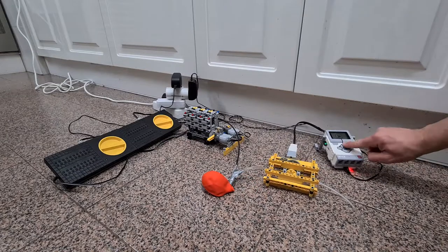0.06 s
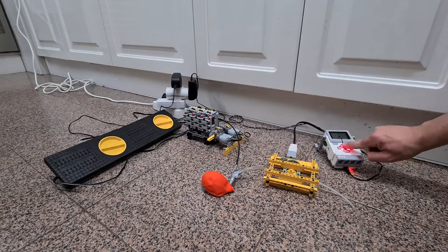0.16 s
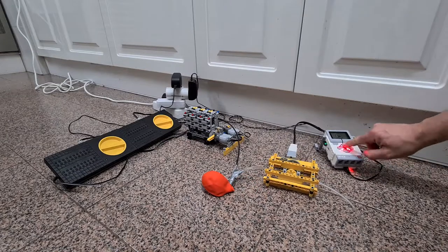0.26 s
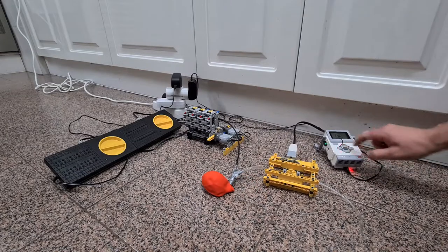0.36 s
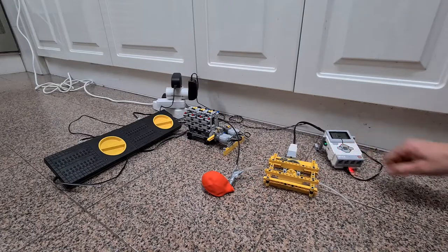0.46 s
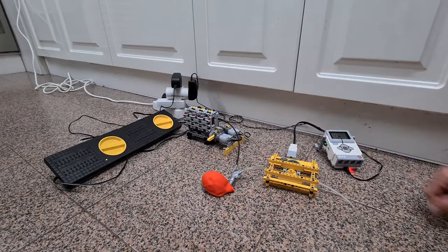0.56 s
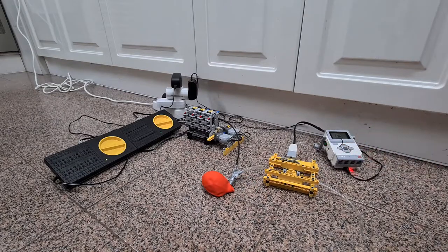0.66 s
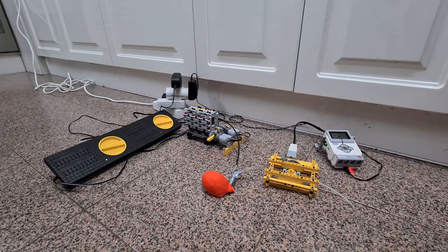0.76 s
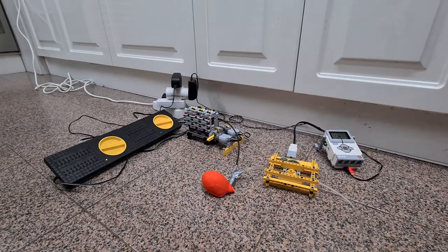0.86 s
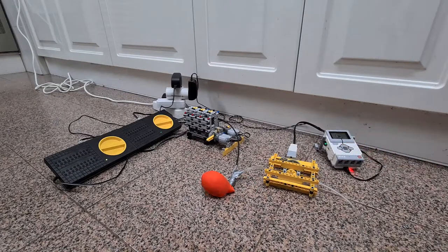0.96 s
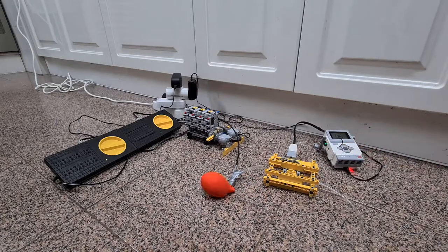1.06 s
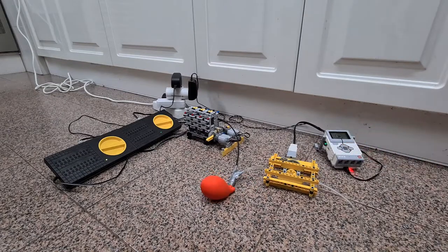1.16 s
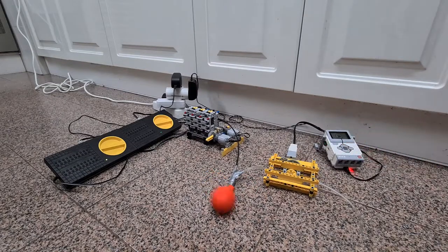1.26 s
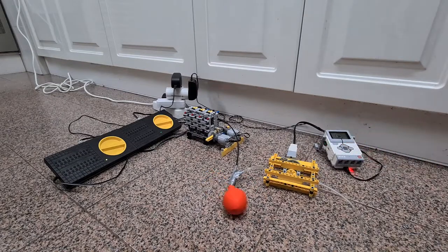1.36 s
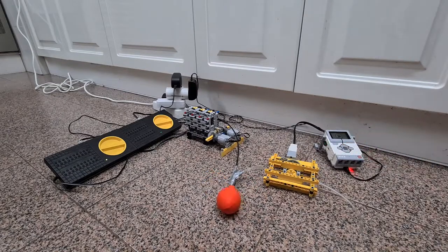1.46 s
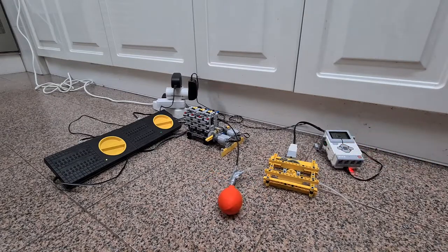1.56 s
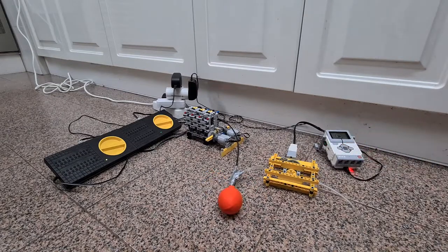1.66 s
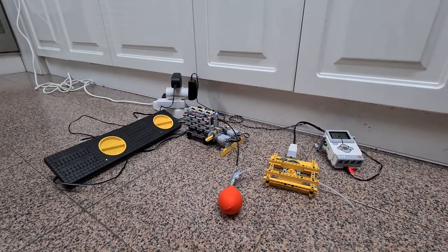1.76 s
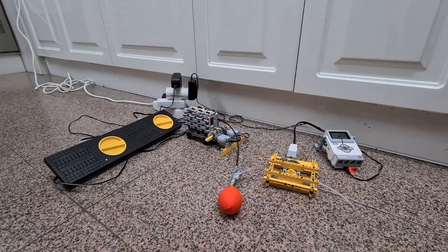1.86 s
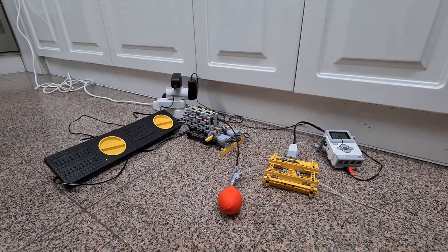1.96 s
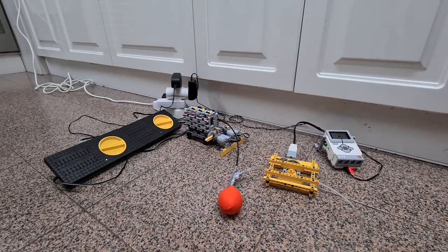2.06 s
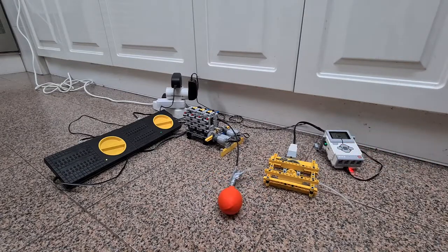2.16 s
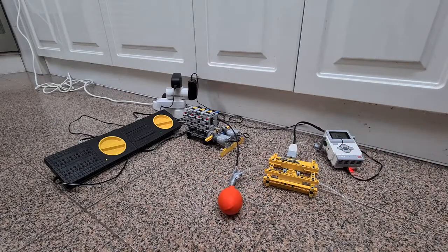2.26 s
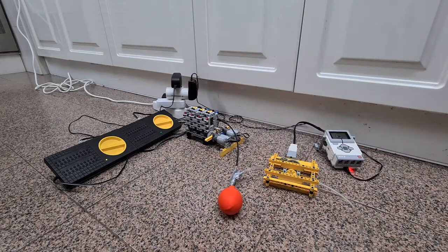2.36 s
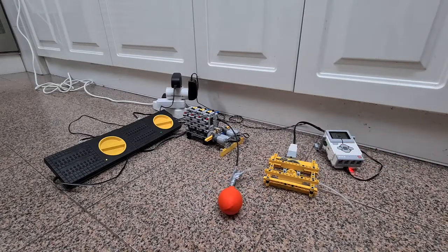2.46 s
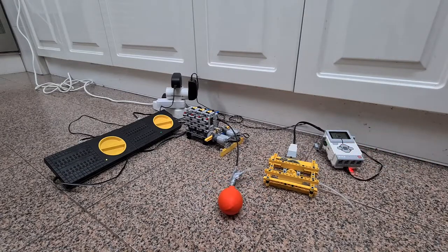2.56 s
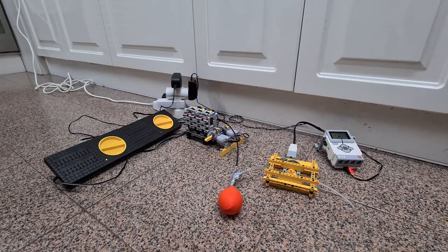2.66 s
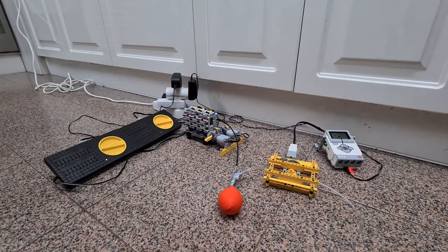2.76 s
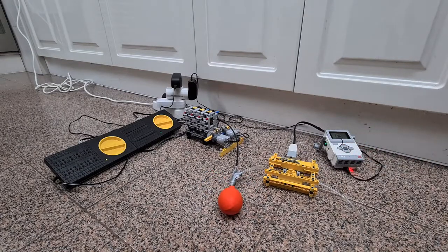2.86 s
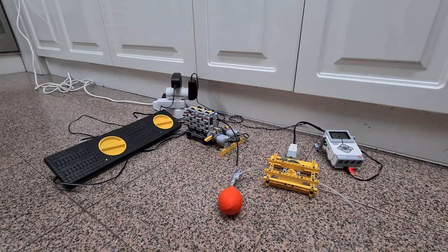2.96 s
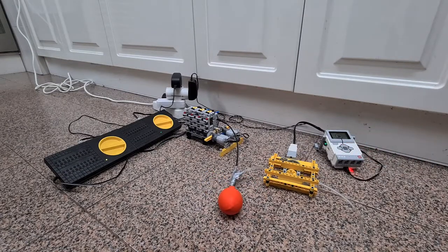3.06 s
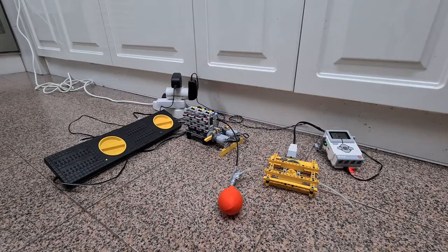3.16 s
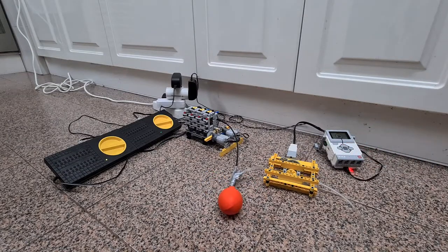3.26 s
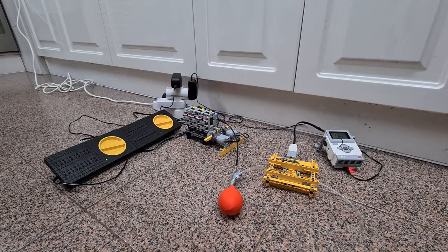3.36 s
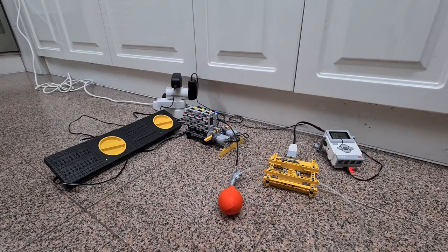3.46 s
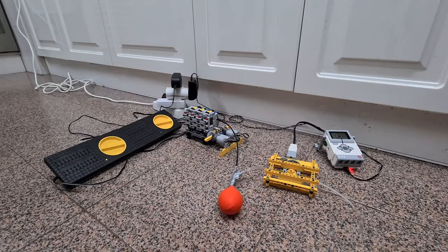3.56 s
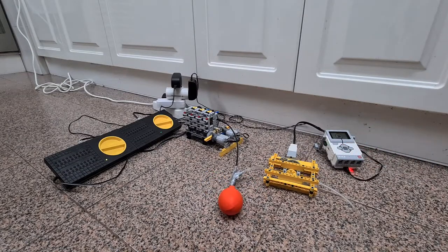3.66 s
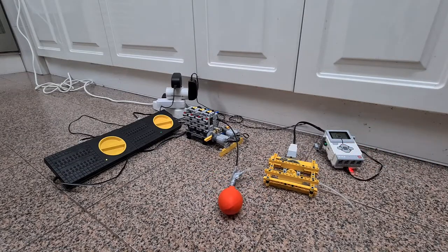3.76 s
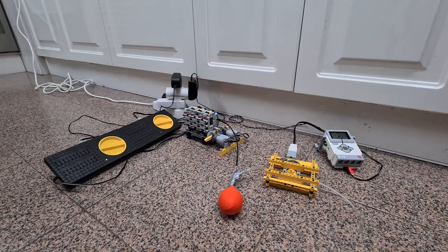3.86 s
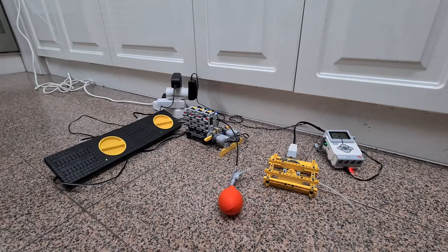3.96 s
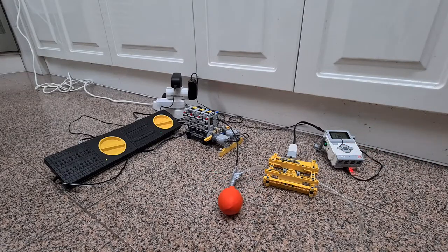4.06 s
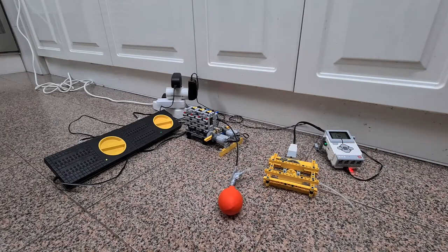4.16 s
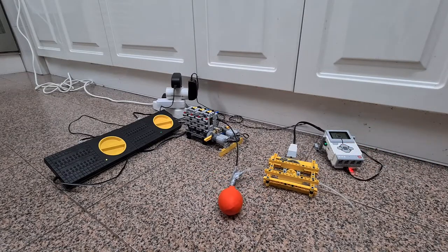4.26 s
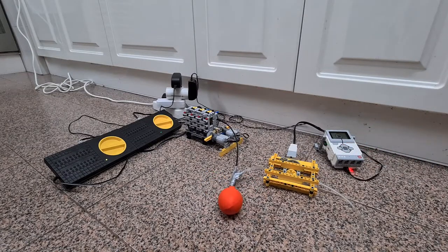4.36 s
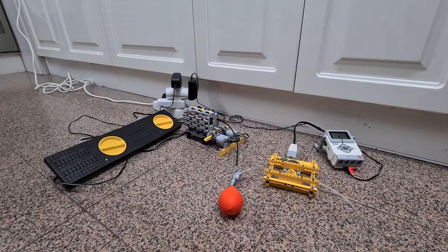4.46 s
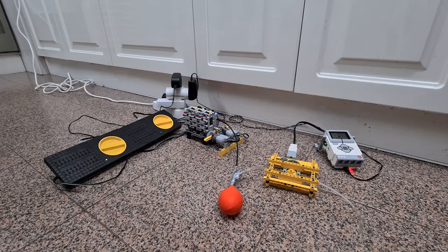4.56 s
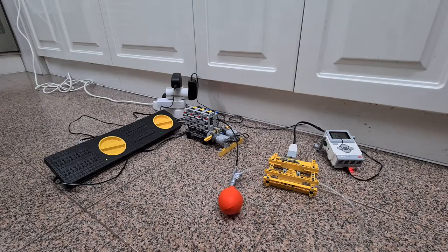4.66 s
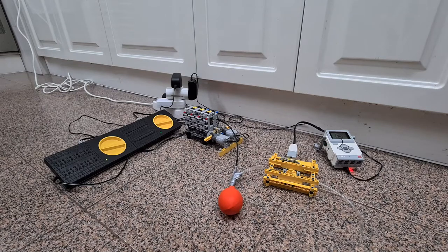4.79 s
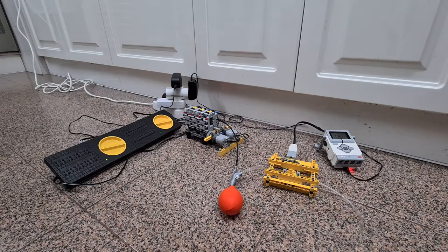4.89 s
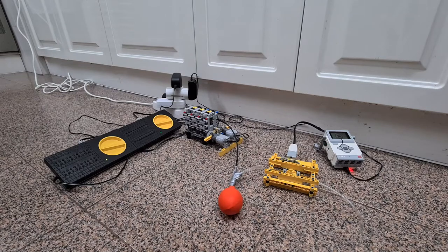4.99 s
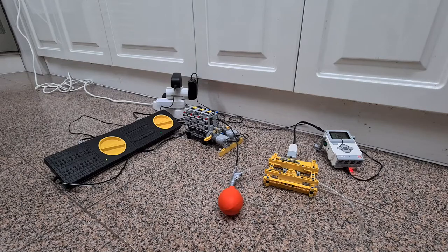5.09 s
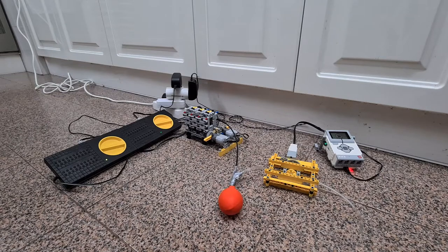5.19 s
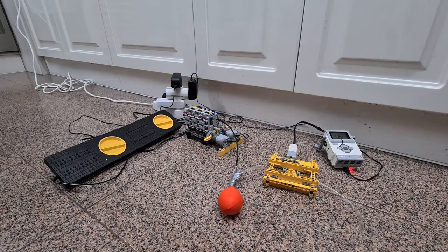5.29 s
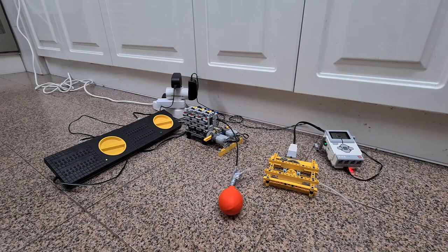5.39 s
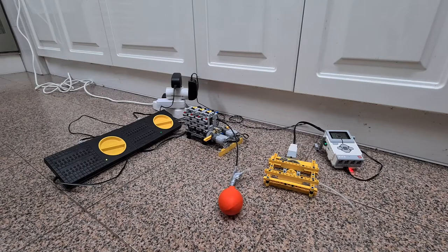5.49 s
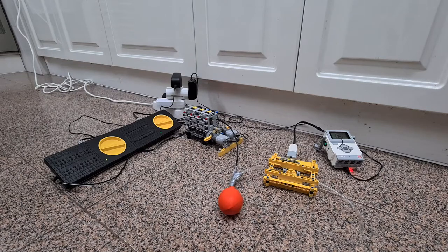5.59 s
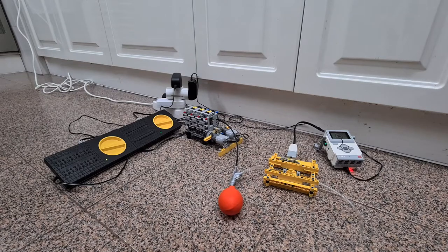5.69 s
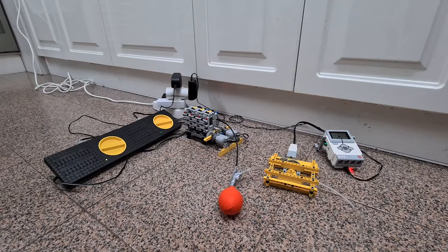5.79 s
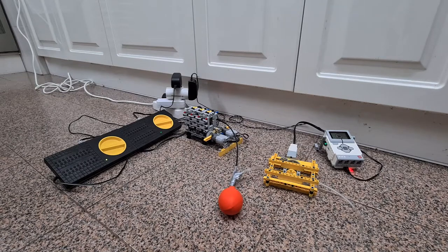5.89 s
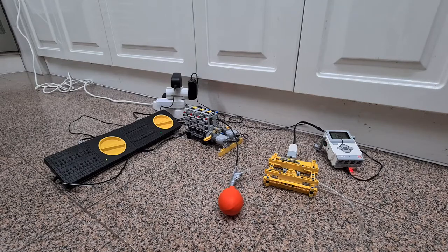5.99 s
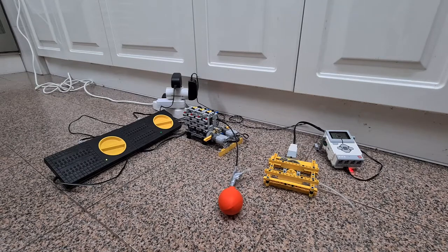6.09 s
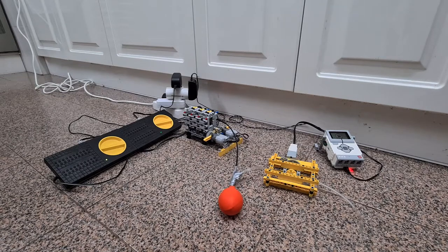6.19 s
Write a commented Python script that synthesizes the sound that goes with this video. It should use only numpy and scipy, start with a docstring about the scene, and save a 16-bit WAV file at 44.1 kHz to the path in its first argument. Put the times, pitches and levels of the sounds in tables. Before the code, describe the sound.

After a couple of clicks, a small motorized air pump whirs to life and keeps up a fast plastic clatter with airy hiss.

```python
"""A small electric air compressor with plastic gears stands on a stone floor and fills a balloon.
First a button clicks down and springs back. The motor starts with a tick and the gears creak.
Then the gears rattle and whine. On each turn of the crank six valves tick, the loose links knock
and the frame shudders; ticks and hiss grow as the air pressure builds. Early on the balloon tips
against the floor, later the frame bumps once, and the motor runs on to the end."""
import sys
import numpy as np
from scipy import signal
from scipy.fft import rfft, irfft, next_fast_len
from scipy.io import wavfile

SR = 44100
rng = np.random.default_rng(int(sys.argv[2]) if len(sys.argv) > 2 else 0)


def transcribe(u):
    """Save the signal u as a 16-bit wav file named by the first command-line argument.

    u: samples, shape (n,) or (channels, n), limited to [-1, 1]; the rate is SR.
    q: integer samples, one column per channel.
    """
    v = np.clip(np.atleast_2d(u).T, -1, 1)
    q = np.round(v * 32767).astype(np.int16)
    wavfile.write(sys.argv[1], SR, q)


N = 274743
TIME = np.arange(N) / SR
FFT_SIZE = 2 * next_fast_len(N // 2 + SR // 4)
FREQ_HZ = np.maximum(np.arange(FFT_SIZE // 2 + 1) * SR / FFT_SIZE, 1)
TURNS_PER_S, REST_TURNS = 6.3484, 0.3346   # the crank's set speed and its angle before the start
ROOM_DECAY_S = 0.18   # every decay here is the time to fade by 60 dB

# Overall tone of the gears: pitch_hz, level_db
GEAR_TONE = [(120, -42), (200, -18), (373, -16.5), (529, -9.5), (590, -12), (836, -13.5), (1120, -5),
             (1530, -10), (1940, -0.5), (2330, -3.5), (4350, -6), (4770, 3.5), (13300, -13), (16000, -16)]
# Peaks and dips that the plastic housing adds: pitch_hz, width_hz, gain_db
HOUSING_PEAKS = [(210, 30, -21.5), (369.4, 11, 8.5), (534, 69, -14), (596, 71, 10), (759, 37, 11.5),
                 (801, 150, -3.5), (922, 30, 8.5), (990, 42, 6.5), (1054, 24, 7), (1250, 270, 4.5),
                 (1533, 61, -2.5), (1930, 20, 2.5), (2320, 370, -3.5), (2923, 190, 6.5), (3550, 190, -3.5),
                 (3700, 140, 7.5), (4030, 57, 6), (4430, 330, -3), (5060, 440, -8.5), (6000, 900, -4),
                 (6950, 2500, 2), (8140, 330, 3.5)]
# Notes of the meshing gears at the set speed: pitch_hz, level_db
WHINE_NOTES = [(1940, -50), (2890, -55), (4700, -52), (4860, -54), (5650, -54)]
# The pistons hold the gears back and let them go: place_turns, extra_speed_share, whine_db
PISTON_LOAD = [(0.02, -0.01, 1.5), (0.15, 0.011, -4), (0.3, 0.0047, -1.5), (0.5, 0.012, -4),
               (0.59, -0.013, -1), (0.76, 0.016, -1.5), (0.92, -0.002, -5)]
# Valve ticks in each turn: place_turns, level_db
VALVE_TICKS = [(0.995, -28), (0.15, -37.5), (0.322, -28.5), (0.488, -30.5), (0.648, -39), (0.824, -26)]
# Tone of a valve tick: pitch_hz, level_db
VALVE_TONE = [(300, -14), (700, -15), (1200, 1), (2000, -9.5), (3200, 7), (4500, -2), (7000, 5.5),
              (10000, 2), (13000, 2.5), (16000, -1)]
# A valve snaps shut harder: start_s, level_db
VALVE_SNAPS = [(1.709, -36), (2.025, -37), (3.788, -39), (4.074, -40), (5.176, -39), (5.648, -36)]
# Tone of a snap: pitch_hz, level_db
SNAP_TONE = [(1000, -19), (5000, -3), (8500, 6), (10500, 9), (12500, -9), (16000, -30)]
# Knocks of the loose links in each turn: place_turns, level_db
LINK_KNOCKS = [(0.165, -46), (0.33, -50.5), (0.48, -48), (0.647, -48.5), (0.749, -47.5), (0.836, -47.5),
               (0.875, -50)]
# Notes the links ring with: pitch_hz, level_db, decay_s
LINK_NOTES = [(756, -13.5, 0.031), (1030, -8.5, 0.057), (1107, -7, 0.14), (1212, -6, 0.047),
              (1372, -1, 0.026), (1730, -17.5, 0.022), (2130, -3.5, 0.044), (3140, -5.5, 0.027)]
# Swells of frame shaking in each turn: place_turns, width_turns, pitch_hz, glide_hz_per_turn, level_db
FRAME_SWELLS = [(0, 0.068, 87.5, -6, -53), (0.23, 0.045, 91, 40, -52), (0.41, 0.066, 84, 60, -58),
                (0.53, 0.062, 112, 20, -56.5), (0.1, 0.064, 198, 100, -64), (0.34, 0.053, 179, 62, -60),
                (0.3, 0.02, 385, 0, -62.5), (0.26, 0.05, 446, 200, -62), (0.425, 0.065, 374, -160, -56),
                (0.4, 0.02, 360, 0, -69), (0.7, 0.022, 605, 0, -52.5), (0.76, 0.032, 700, -3, -61)]
# Tone of the frame's rumble: pitch_hz, level_db
RUMBLE_TONE = [(20, -24), (40, -11), (60, 5), (83, 13), (115, 2.5), (160, -11), (220, -24), (400, -23)]
# The button goes down: start_s, level_db, decay_s, room_db
BUTTON_PRESS = [(0.1265, -28.5, 0.024, -3.5)]
# Tone of the press: pitch_hz, level_db
PRESS_TONE = [(180, -73), (300, -39), (961, -18), (1060, -4.5), (1410, -5.5), (1810, -8), (2100, -5),
              (2880, -8), (3290, -6.5), (5160, -3.5), (16000, -39)]
# The button comes up and bounces: start_s, level_db
BUTTON_RELEASE = [(0.3346, -38), (0.3392, -44), (0.3495, -42)]
# Notes the button's case rings with: pitch_hz, level_db, decay_s
CASE_NOTES = [(636, -22, 0.049), (1100, -11, 0.05), (1310, -6, 0.04), (1360, -8.5, 0.025),
              (1616, -17, 0.04), (2190, -26, 0.045), (3900, -24, 0.02), (5460, -23, 0.005)]
# Echoes off the floor and cupboard doors: delay_s, level_db
NEAR_ECHOES = [(0.0048, -26), (0.017, -22)]
# The motor starts with a tick: start_s, level_db, decay_s, room_db
MOTOR_TICK = [(0.5985, -47.5, 0.03, 8)]
# Tone of that tick: pitch_hz, level_db
MOTOR_TICK_TONE = [(300, -23), (800, -23), (1200, 7), (1600, -22), (2100, -2), (3000, -3), (4200, 2),
                   (5200, -6), (6100, -1), (7500, -11), (9000, -22), (16000, -21)]
# Tone of the gears' creak: pitch_hz, level_db
CREAK_TONE = [(240, -58), (400, -20), (1060, -6), (2120, -11), (2630, -6), (3420, -3), (4580, -16),
              (6440, -5.5), (8760, -19), (11600, -12), (16000, -28)]
# The balloon tips against the floor: start_s, level_db, decay_s, room_db
BALLOON_TIP = [(1.342, -46.5, 0.064, 5)]
# Tone of the balloon's tap: pitch_hz, level_db
BALLOON_TONE = [(100, -25), (300, -6), (450, -2), (750, -3), (1200, 3), (4000, -44)]
# The frame bumps once: start_s, level_db, decay_s, room_db
FRAME_BUMP = [(2.815, -44.5, 0.13, -8)]
# Tone of the bump: pitch_hz, level_db
BUMP_TONE = [(20, -18), (40, -7), (70, -9), (100, 4), (150, -19), (400, -49)]
# Tone of the still room: pitch_hz, level_db
ROOM_TONE = [(15, -17), (25, 0), (76, 1), (145, -7.5), (293, -5), (775, -9), (863, -5.5), (2110, -19),
             (2840, -17.5), (5430, -21), (6560, -17.5), (9570, -33), (16000, -35)]
# How wide the sound is: pitch_hz, side_minus_middle_db
STEREO_WIDTH = [(60, -32), (120, -12), (240, -9), (480, -11.5), (950, -5.5), (1890, -2.5), (3770, 0),
                (7520, 0.5), (15000, 0.5)]
# Which way the sound leans: pitch_hz, left_minus_right_db
STEREO_LEAN = [(60, -6.5), (83, -1), (110, 0), (160, -4), (220, -9), (300, -2), (420, 0.5), (580, -3.5),
               (810, -3.5), (1120, 0), (1540, -3), (2140, -0.5), (2960, -1), (3750, -4.5), (4300, 2),
               (4750, -7.5), (5600, 0.5), (6500, -5.5), (7600, 2), (8500, 3), (9500, -0.7), (10800, -2),
               (15000, -3)]


def compressor():
    """Everything the turning crank drives; the gears and links get louder with speed."""
    speed, turns = crank()
    pressure_db = air_pressure(turns)
    drive = speed ** 2.5
    gears = drive * (gear_rattle(turns) + gear_whine(turns))
    air = valve_ticks(turns, pressure_db) + valve_snaps() + air_leak(pressure_db)
    shaking = speed ** 2 * frame_shudder(turns)   # shaking forces grow with the square of speed
    return gears + air + shaking + drive * link_clatter(turns)


def crank(start_s=0.598, ramp_s=0.16, sag_share=0.0266, recover_s=0.48):
    """The motor speeds up, falls a little short, and its regulator closes the gap."""
    running_s = np.maximum(TIME - start_s, 0)
    sag = sag_share * np.exp(-running_s / recover_s)
    speed = np.minimum(running_s / ramp_s, 1) * (1 - sag)   # 1 is the set speed
    turns = REST_TURNS + TURNS_PER_S * np.cumsum(speed) / SR
    return speed, turns


def gear_rattle(turns, level_db=-37.5, teeth_per_turn=148, slack_teeth=0.4, spread_db=5):
    """Loose teeth knock unevenly, nearly a thousand a second, and the housing rings with them."""
    teeth = np.arange(turns[0] * teeth_per_turn, turns[-1] * teeth_per_turn)[1:]
    force, slip = scatter((len(teeth), 2)).T
    times = np.interp((teeth + slack_teeth * slip) / teeth_per_turn, turns, TIME)
    knocks = strikes(times, spread_db * force, decay_s=0.015, room_db=-1)
    return from_db(level_db) * rms_one(housing(knocks))


def housing(knocks, ring_db=-10.5):
    """The plastic panels ring on after each knock and favour some pitches over others."""
    ringing = knocks + from_db(ring_db) * noisy_tail(knocks[0], decay_s=0.088, samples=SR // 8)
    peaks_db = sum(db / (1 + (2 * (FREQ_HZ - hz) / width) ** 2) for hz, width, db in HOUSING_PEAKS)
    return colour(ringing, GEAR_TONE, peaks_db)


def gear_whine(turns, wander_share=0.007, flutter_db=6):
    """The whine rises and sags with the pistons, blurred as loose gears run ahead and fall back."""
    place, extra_speed, load_db = np.transpose(PISTON_LOAD)
    speed = np.gradient(turns) * SR / TURNS_PER_S
    speed *= 1 + np.interp(turns, place, extra_speed, period=1)
    whine = np.zeros((2, N))
    for channel in whine:
        for hz, db in WHINE_NOTES:
            pitch_hz = hz * speed * (1 + wander_share * drift(39.8))
            phase = 2 * np.pi * np.cumsum(pitch_hz) / SR
            flutter = from_db(flutter_db * np.tanh(drift(41)))
            channel += from_db(db) * rms_one(flutter * np.sin(phase))
    return whine * from_db(np.interp(turns, place, load_db, period=1))


def air_pressure(turns, filled_db=-7, fill_turns=1.9, stretch_db_per_turn=0.0428):
    """Pressure, as a gain in dB: it builds quickly, then creeps up as the balloon stretches."""
    pumped = turns - REST_TURNS
    filled = np.maximum(1 - np.exp(-pumped / fill_turns), 1e-6)
    return filled_db + 20 * np.log10(filled) + stretch_db_per_turn * pumped


def valve_ticks(turns, pressure_db, spread_db=2.5, jitter_s=0.0003):
    """Each of the six piston strokes ends in a tick and a spit of air."""
    times, level_db = each_turn(turns, VALVE_TICKS)
    lateness, force = scatter((len(times), 2)).T
    level_db = level_db + np.interp(times, TIME, pressure_db) + spread_db * force
    ticks = strikes(times + jitter_s * lateness, level_db, decay_s=0.031, room_db=-4)
    return colour(ticks, VALVE_TONE)


def valve_snaps():
    """Now and then a valve shuts harder, short and bright."""
    times, level_db = np.transpose(VALVE_SNAPS)
    return colour(strikes(times, level_db, decay_s=0.044, room_db=-6), SNAP_TONE)


def link_clatter(turns, jitter_s=0.00121):
    """The loose plastic links knock and ring as the crank goes round."""
    times, level_db = each_turn(turns, LINK_KNOCKS)
    times = times + jitter_s * scatter(len(times))
    return in_room(ring(times, level_db, LINK_NOTES, spread_db=5), room_db=-4)


def frame_shudder(turns, rumble_db=-68, load_swing_db=3, quietest_turns=0.16):
    """The pistons shake the frame in the same swells each turn, over a rumble that follows their load."""
    turn_s = 1 / np.median(np.gradient(turns) * SR)
    shudder = np.zeros((2, N))
    for place, width, hz, glide, db in FRAME_SWELLS:
        offset = (turns - place + .5) % 1 - .5   # turns from the middle of the swell
        phase = 2 * np.pi * turn_s * offset * (hz + glide * offset / 2) + 0.12 * drift(2)
        swell = from_db(db + 0.8 * drift(2)) * np.exp(-(offset / width) ** 2 / 2)
        shudder += swell * np.array([np.cos(phase), np.sin(phase)])
    load_db = -load_swing_db * np.cos(2 * np.pi * (turns - quietest_turns))
    return shudder + from_db(rumble_db + load_db) * colour(noise(), RUMBLE_TONE)


def air_leak(pressure_db, level_db=-53):
    """Air escapes past the pistons as a smooth, bright hiss."""
    return from_db(level_db + pressure_db) * cut_bass(noise(), edge_hz=7000)


def button():
    """The button clicks down, echoing off hard surfaces, then springs back with a hollow tock."""
    press = clicks(BUTTON_PRESS, PRESS_TONE)
    echoes = np.zeros((2, N))
    for delay_s, db in NEAR_ECHOES:
        for echo, channel in zip(echoes, press):
            echo += from_db(db) * np.interp(TIME - delay_s, TIME, channel, left=0)
    times, level_db = np.transpose(BUTTON_RELEASE)
    release = in_room(ring(times, level_db, CASE_NOTES, spread_db=0), room_db=-8)
    return press + echoes + release


def gear_creak(middle_s=0.644, half_length_s=0.024, peak_db=-43.5, fade_db=11.5, slip_count=15):
    """Plastic slips on plastic as the gears take up their slack, hardest in the middle of the creak."""
    along = np.linspace(-1, 1, slip_count)
    times = middle_s + half_length_s * along
    slips = strikes(times, peak_db - fade_db * np.abs(along), decay_s=0.025, room_db=-2)
    return colour(slips, CREAK_TONE)


def still_room(level_db=-73):
    """The faint, low, steady noise of the room."""
    return from_db(level_db) * colour(noise(), ROOM_TONE)


def clicks(rows, tone):
    """Single knocks that share one tone."""
    return colour(sum(strikes([s], [db], decay_s, room_db) for s, db, decay_s, room_db in rows), tone)


def strikes(times, level_db, decay_s, room_db):
    """Each hit scatters into a short burst of noise, followed by the room's tail."""
    energy = from_db(level_db) ** 2 * decay_s * SR / np.log(1e6)   # so a burst starts at level_db
    direct = die_away(pulses(times, energy), decay_s)
    room = from_db(room_db) ** 2 * die_away(direct, ROOM_DECAY_S)
    return np.sqrt(direct + room) * noise()


def ring(times, level_db, notes, spread_db):
    """Each knock sets a part's own notes ringing, each varied by up to spread_db."""
    forces = from_db(level_db[:, None] + spread_db * scatter((len(times), len(notes))))
    ringing = np.zeros(N)
    for (hz, db, decay_s), force in zip(notes, forces.T):
        fade, step = from_db(-60 / (decay_s * SR)), 2 * np.pi * hz / SR   # per sample
        feedback = [1, -2 * fade * np.cos(step), fade * fade]
        ringing += from_db(db) * signal.lfilter([0, np.sin(step)], feedback, pulses(times, force) + 1e-18)
    return cut_bass(ringing, edge_hz=640)   # small plastic parts give off little bass


def each_turn(turns, rows):
    """Times and levels of hits that come back on every turn of the crank."""
    place, level_db = np.transpose(rows)
    angles = (np.arange(np.ceil(turns[-1]))[:, None] + place).ravel()
    reached = (angles > turns[0]) & (angles < turns[-1])
    return np.interp(angles[reached], turns, TIME), np.resize(level_db, len(angles))[reached]


def pulses(times, sizes):
    """Silence with a one-sample spike at each time."""
    samples = np.clip(np.round(np.asarray(times) * SR).astype(int), 0, N - 1)
    return np.bincount(samples, sizes, N)


def die_away(energy, decay_s):
    """Spread energy over a fading tail."""
    fade = 10 ** (-6 / (decay_s * SR))
    return signal.lfilter([1 - fade], [1, -fade], energy + 1e-24)


def in_room(sound, room_db):
    """A sound from straight ahead, with the room's short tail."""
    return sound * [[1], [0]] + from_db(room_db) * noisy_tail(sound, ROOM_DECAY_S, SR // 4)


def noisy_tail(sound, decay_s, samples):
    """Smear one sound into two different tails of fading noise."""
    tail = rng.standard_normal((2, samples)) * from_db(-60 * TIME[:samples] / decay_s)
    tail /= np.sqrt(np.sum(tail ** 2) / 2)
    return signal.fftconvolve(sound[None], tail, axes=1)[:, :N]


def stereo(pair):
    """Middle and side signals become left and right: alike in the bass, wide in the treble."""
    middle, side = rfft(pair, FFT_SIZE)
    side = side * from_db(curve_db(STEREO_WIDTH))
    lean = from_db(curve_db(STEREO_LEAN) / 2)
    return irfft([(middle + side) * lean, (middle - side) / lean])[:, :N]


def colour(sound, tone, extra_db=0):
    """Give a sound the tone of a table; white noise keeps its power."""
    cepstrum = irfft(np.log(rms_one(from_db(curve_db(tone) + extra_db))))
    cepstrum[1:FFT_SIZE // 2] *= 2   # folded so the filter rings only after a hit (minimum phase)
    cepstrum[FFT_SIZE // 2 + 1:] = 0
    return irfft(rfft(sound, FFT_SIZE) * np.exp(rfft(cepstrum)))[..., :N]


def curve_db(points):
    """Join a table's points into a level at every frequency."""
    hz, db = np.transpose(points)
    return np.interp(np.log(FREQ_HZ), np.log(hz), db)


def cut_bass(sound, edge_hz):
    """Turn down everything below the edge."""
    return signal.sosfilt(signal.butter(2, edge_hz, "high", fs=SR, output="sos"), sound)


def drift(rate_hz, hop=40, warm_up=2000):
    """A smooth random wobble of typical size 1, worked out once every hop samples."""
    fade = np.exp(-2 * np.pi * rate_hz * hop / SR)
    chance = rng.standard_normal(N // hop + warm_up + 2)
    slow = signal.lfilter([1], [1, -2 * fade, fade * fade], chance)[warm_up:]
    return np.interp(np.arange(N) / hop, np.arange(len(slow)), rms_one(slow))


def noise():
    """Two unrelated channels of white noise."""
    return rng.standard_normal((2, N))


def scatter(shape):
    """Random numbers between -1 and 1."""
    return rng.uniform(-1, 1, shape)


def from_db(db):
    """Turn decibels into a gain."""
    return 10 ** (np.asarray(db) / 20)


def rms_one(sound):
    """Scale to an average power of 1."""
    return sound / np.sqrt(np.mean(sound ** 2) + 1e-20)


def scene():
    """The button and start-up, two small knocks, the running compressor and the still room."""
    start = button() + clicks(MOTOR_TICK, MOTOR_TICK_TONE) + gear_creak()
    knocks = clicks(BALLOON_TIP, BALLOON_TONE) + clicks(FRAME_BUMP, BUMP_TONE)
    background = still_room()
    return stereo(compressor() + start + knocks + background)


def record(dry):
    """Cut the highest treble steeply, above 15900 Hz."""
    return signal.sosfilt(signal.ellip(12, .1, 80, 15900, fs=SR, output="sos"), dry)


dry = scene()
out = record(dry)
transcribe(out)
```